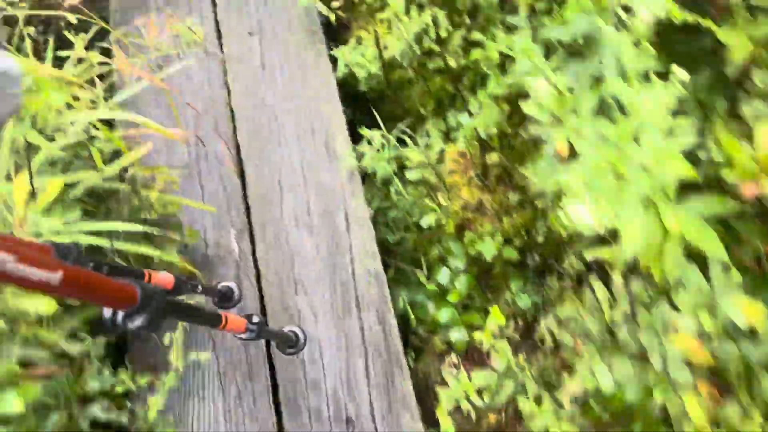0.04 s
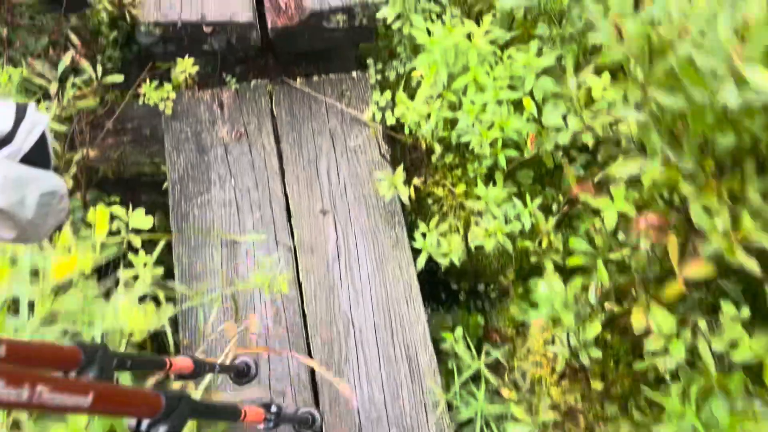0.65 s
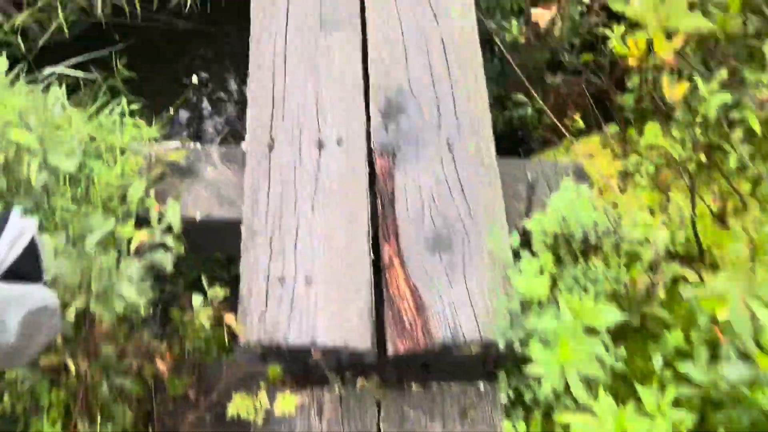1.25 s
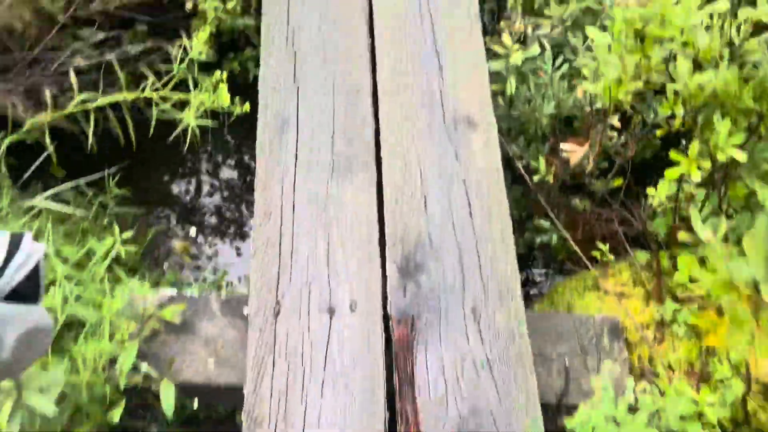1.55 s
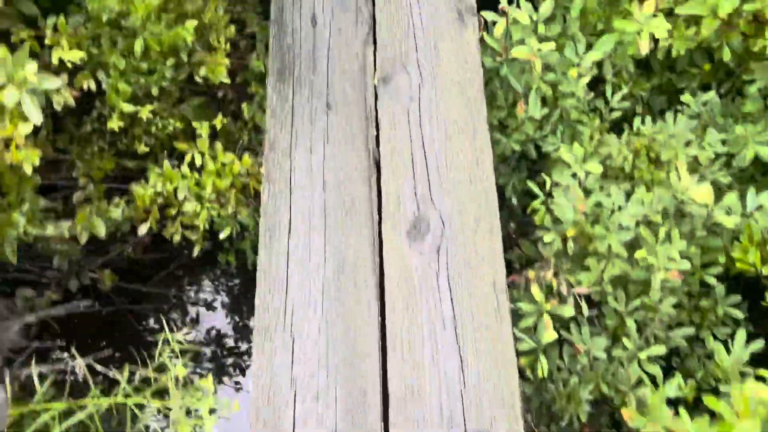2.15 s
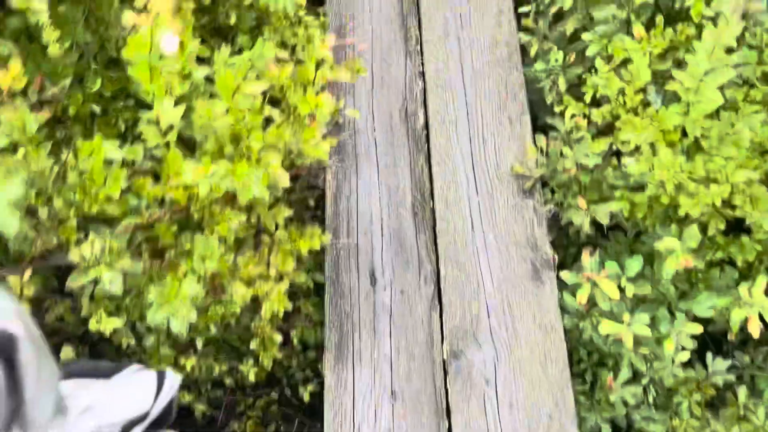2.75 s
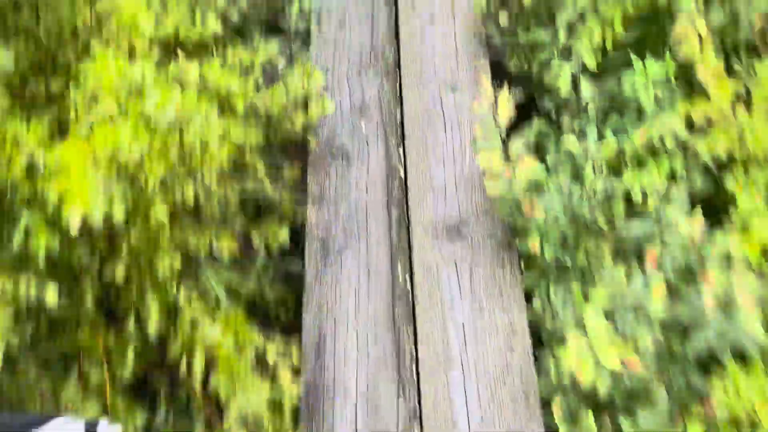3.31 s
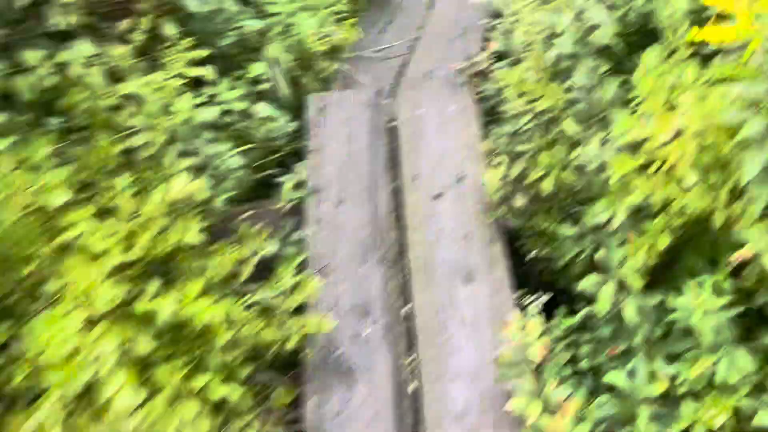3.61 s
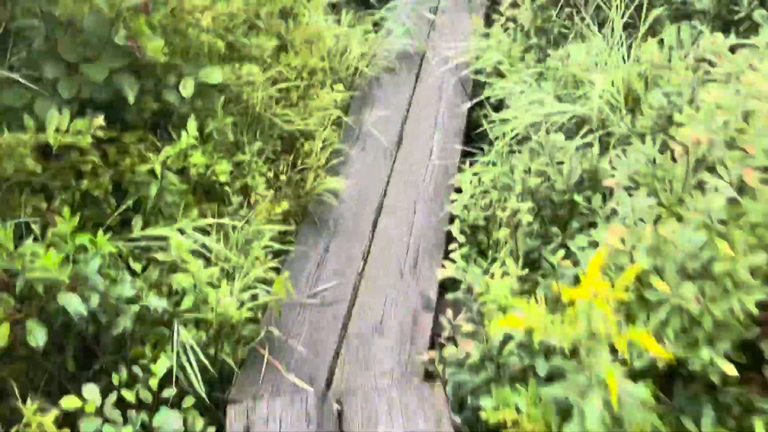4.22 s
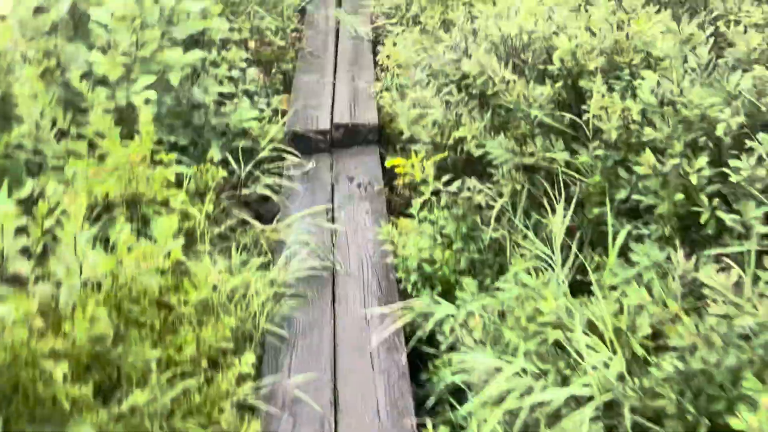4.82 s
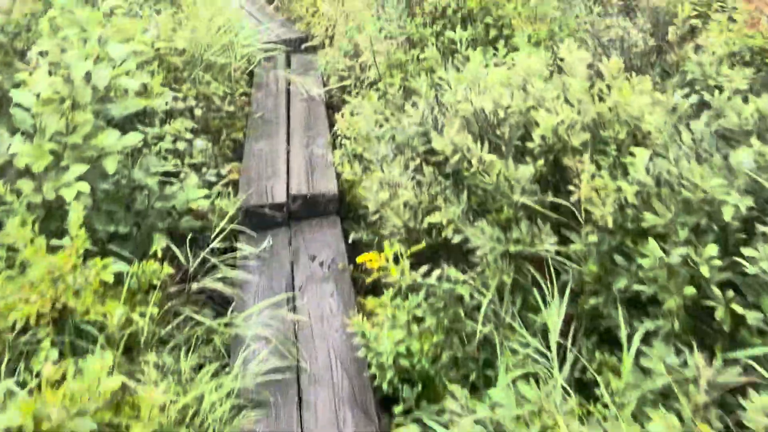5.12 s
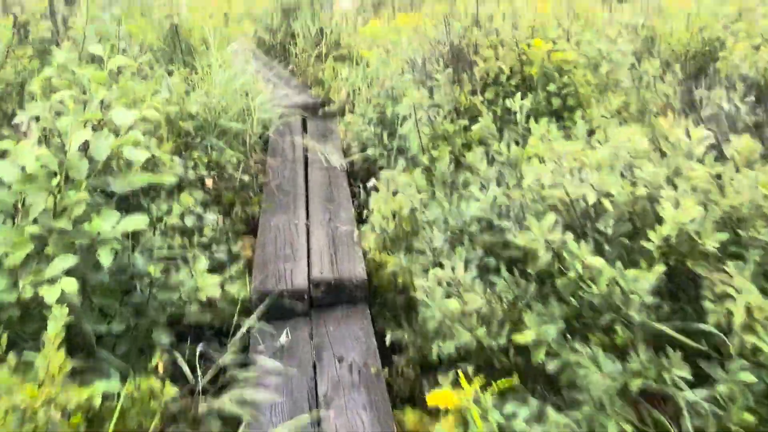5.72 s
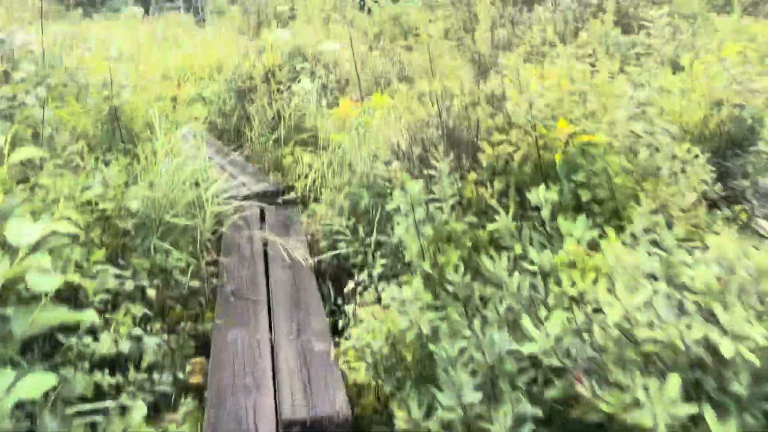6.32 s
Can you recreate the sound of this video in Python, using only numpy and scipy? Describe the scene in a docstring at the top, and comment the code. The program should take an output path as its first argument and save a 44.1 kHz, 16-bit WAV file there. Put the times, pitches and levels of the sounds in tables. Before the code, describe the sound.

Close, dry footsteps thud on damp wooden planks, mixed with uneven clacks of trekking pole tips and short scuffs of soles. One hard pole bump hits near the microphone just after the start. The walk carries on with fabric and foliage rustling and ticking, swelling briefly near the end. Each step stirs a soft, low air rumble on the microphone, above the faint hush of the woods.

```python
"""Boots thud along a plank boardwalk in wet woodland, each step pushing down a board that springs back.
The hiker's trekking poles and loose planks clack, and soles and tips grind on the damp wood.
Clothing and leaves swish and crackle with every stride, in tiny slips over a duller scuff.
Early on a pole bumps hard, close to the microphone; stems and straps tick here and there.
Underneath, stirred air rumbles softly over the hush of the woods."""
import sys
import numpy as np
from scipy import signal
from scipy.fft import rfft, irfft
from scipy.io import wavfile

SR = 44100
rng = np.random.default_rng(int(sys.argv[2]) if len(sys.argv) > 2 else 0)


def file_out(sig):
    """Save sig as 16-bit WAV at sys.argv[1]."""
    # one column per channel
    cols = np.atleast_2d(sig).T
    # limit, then scale
    lim = np.clip(cols, -1, 1)
    pcm = np.round(lim * 32767).astype(np.int16)
    wavfile.write(sys.argv[1], SR, pcm)


N = 284922

# Boots landing, rolling and shifting weight. Each row: time in seconds, level in dB,
# pitch of the push in Hz, level of the stirred air in dB.
FOOTFALLS = [(.428, -30, 116, -35), (.473, -24.5, 261, -55), (0.508, -26.5, 140, -59),
             (.689, -29.5, 58.4, -47), (0.781, -28.5, 69, -39.5), (1.088, -36, 55.5, -37.5),
             (1.484, -35, 60.5, -37), (1.551, -25, 85, -48), (2.004, -32.5, 31.2, -37),
             (2.21, -27, 110, -47), (2.253, -32, 204, -36), (2.56, -41, 28, -38.5), (2.73, -28.5, 49, -53),
             (3.179, -31.5, 109, -45), (3.355, -36, 34.7, -39), (3.741, -24, 150, -31.5),
             (3.784, -23, 86, -36), (3.95, -33.5, 48, -47.5), (4.392, -34, 31.8, -37),
             (5.258, -36.5, 92, -47), (5.341, -39, 50, -39), (5.585, -26.5, 360, -60),
             (5.783, -32, 84, -39), (5.825, -28.5, 133, -46), (5.847, -26, 516, -49), (5.882, -33, 50, -38),
             (6.128, -27.5, 209, -37.5)]
# Pole tips and planks clacking. Each row: start in seconds, level in dB, centre of the tone in Hz.
CLACKS = [(.0398, -30.5, 1140), (0.0499, -35.5, 990), (.0925, -31, 990), (.4473, -39, 1300),
          (.485, -36, 1400), (0.5165, -27, 1480), (1.2261, -42.5, 850), (1.4768, -33, 1150),
          (1.781, -45, 750), (1.8032, -44, 700), (1.864, -39, 990), (2.233, -30, 1510),
          (2.248, -33.5, 1100), (2.4744, -40, 1100), (2.707, -44.5, 900), (2.9687, -41.5, 970),
          (3.2135, -35.5, 1020), (3.581, -35, 920), (3.5953, -25, 1190), (3.753, -34.5, 960),
          (3.7892, -30.5, 1760), (3.9316, -43, 1000), (4.042, -44, 1100), (4.401, -37, 1150),
          (4.545, -38.5, 885), (4.622, -39, 1150), (4.635, -30.5, 1380), (5.008, -41.5, 1190),
          (5.0381, -34, 750), (5.5732, -28.5, 970), (5.6934, -34, 1170), (5.8407, -29, 1400),
          (5.853, -30, 1550), (5.999, -38.5, 1270), (6.0945, -37, 935), (6.3317, -39.5, 1540)]
# The ring of a damp plank. Each row: pitch in Hz, level in dB, time to fall 60 dB in seconds.
PLANK_MODES = [(354, -35, 0.087), (576, 5.5, 0.023), (825, 8.5, 0.0094), (1100, -4, 0.01),
               (1303, 0.5, 0.0094), (1760, -13.5, 0.013), (2550, 2, .012), (3820, -19, .01)]
# A sole or tip grinding along the wood. Each row: middle in seconds, half length in seconds,
# level in dB, centre of the tone in Hz.
WOOD_GRINDS = [(0.181, 0.031, -53, 1790), (0.493, 0.013, -53, 2000), (1.492, 0.015, -49, 990),
               (2.29, 0.019, -49.5, 1100), (2.419, .011, -51, 1700), (3.213, 0.0061, -44.5, 1250),
               (3.592, 0.0096, -45.5, 1300), (4.633, 0.0045, -50, 1400), (5.039, 0.011, -55, 880),
               (5.252, 0.0067, -47, 950), (5.583, 0.014, -47, 760), (5.815, 0.0071, -38.5, 1450),
               (5.852, 0.012, -35.5, 1600), (6.129, 0.017, -48, 990)]
# The hits of the close pole bump. Each row: start in seconds, level in dB,
# length of the push in seconds, level of the crack against the push in dB.
POLE_BUMPS = [(.4053, -15, 0.0013, -9.5), (0.4275, -28.5, 0.001, -8.5), (0.4712, -34, 0.0015, -12)]
# The ring of the pole shaft. Each row: pitch in Hz, level in dB, time to fall 60 dB in seconds.
SHAFT_MODES = [(2080, -32, .007), (2600, 2, 0.0052), (4900, -5, 0.0082), (12000, 1, 0.0044),
               (14300, 3, 0.0031)]
# A sleeve, trouser leg or branch sliding past. Each row: middle in seconds, length in seconds,
# swish level in dB, treble over mids in dB, scuff level in dB.
RUB_STROKES = [(0.106, 0.042, -57.5, -4, -55), (0.218, 0.092, -54, -6, -49.5),
               (0.273, .047, -51.5, -7, -65), (0.445, .11, -59, 2, -51), (0.648, 0.12, -61.5, -4, -49),
               (.86, .075, -56.5, -3, -56), (0.926, 0.057, -56, -4, -47), (1.011, .056, -54.5, -4, -51),
               (1.298, 0.086, -62, 2, -54), (1.407, 0.085, -50, -4.5, -51), (1.499, 0.064, -52.5, -3, -43),
               (1.58, 0.096, -60, -1, -51), (1.892, 0.075, -57, -1, -52), (1.99, 0.087, -57, -9, -53),
               (2.077, 0.078, -55.5, -1, -52.5), (2.195, 0.053, -59, 0, -57), (2.422, 0.049, -64.5, 2, -53),
               (2.503, 0.11, -59.5, -3, -55), (2.643, .15, -50.5, 1, -53.5), (2.792, .04, -61, 14, -66),
               (2.927, 0.065, -58.5, 0, -49.5), (3.109, 0.098, -56, -2, -52.5),
               (3.182, 0.066, -55, -4, -47), (3.263, .06, -48.5, -5, -50), (3.375, 0.11, -60, -1, -57),
               (3.534, 0.069, -59.5, 0, -48.5), (3.645, .1, -51, -8.5, -59), (3.765, 0.078, -48, -6, -43.5),
               (3.85, 0.079, -53.5, -4, -55.5), (3.945, 0.052, -57.5, -3, -53.5),
               (4.035, 0.05, -60, 8, -55), (4.166, 0.066, -52, -2, -57.5), (4.229, 0.083, -55, -5, -53.5),
               (4.326, 0.041, -57, -3, -55), (4.433, .14, -62, -11, -54), (4.589, 0.072, -58, -3, -48),
               (4.667, 0.054, -55, -3, -51.5), (4.759, 0.13, -62, -3, -55), (5.162, 0.07, -53, -0.5, -58),
               (5.245, 0.07, -55, -7, -48), (5.305, 0.036, -52, -9, -48.5), (5.374, .045, -58.5, -9, -48),
               (5.7, 0.17, -63.5, -7, -58.5), (5.822, 0.14, -46, -1.5, -44), (5.918, 0.076, -44, 7.5, -44),
               (6.014, 0.033, -56, -10, -48), (6.125, 0.055, -52, -5, -42.5),
               (6.413, 0.18, -57.5, -2.5, -52.5)]
# The light rustle between strokes. Each row: time in seconds, level in dB.
RUSTLE_LEVELS = [(0, -64), (.7, -62.5), (1.15, -65.5), (1.7, -70), (2.1, -63), (2.37, -69.5), (2.75, -64),
                 (3.45, -67), (4.5, -66), (4.95, -69), (5.5, -65), (6.2, -62), (6.46, -71.5)]
# The tone of the swish. Each row: frequency in Hz, level in dB.
SWISH_EQ = [(250, 16), (600, 7), (1150, 5.5), (1800, 0), (3300, -1), (6000, -1), (9000, 1), (12000, 4),
            (14000, 0), (15700, -5)]
# Resonances the fabric rustles through. Each row: centre in Hz, width in Hz, boost in dB.
FABRIC_PEAKS = [(2490, 500, 6.5), (3900, 185, 5), (4790, 500, 6.5), (7400, 200, 2.5), (8100, 160, 2)]
# Ticks and squeaks of stems, straps and wet wood. Each row: start in seconds, level in dB,
# pitch in Hz, decay time in seconds.
BRIGHT_TICKS = [(.2605, -33.5, 3500, 0.00083), (0.407, -45, 12600, 0.0084), (0.468, -41.5, 4930, 0.0025),
                (0.515, -39.5, 9200, .0015), (1.147, -43, 9000, 0.00058), (1.477, -36.5, 3930, 0.001),
                (1.786, -43.5, 8040, 0.0043), (1.795, -39, 8800, .013), (1.872, -44, 7000, .00084),
                (1.987, -40.5, 7460, 0.00076), (2.114, -44, 4500, .001), (2.232, -39.5, 9500, .0015),
                (2.32, -42, 2660, .0011), (2.943, -45.5, 3700, .0022), (3.269, -44, 3540, .0018),
                (4.138, -46, 12000, .002), (4.723, -44, 2760, .0013), (6.351, -42, 5870, 0.0014)]
# The dull tone of the scuff. Each row: frequency in Hz, level in dB.
SCUFF_EQ = [(30, 4.5), (60, 9), (110, 1.5), (200, 1), (400, -4.5), (700, -10.5), (1050, -10), (1600, -18.5),
            (3000, -32.5), (8000, -46)]
# The low rumble of stirred air. Each row: frequency in Hz, level in dB.
BUFFET_EQ = [(8, -2.5), (27, -0.5), (42, -2.5), (60, -13), (110, -13), (180, -44), (400, -33),
             (2000, -54.5)]
# The hush of still woodland. Each row: frequency in Hz, level in dB.
HUSH_EQ = [(30, 24), (150, -10.5), (400, 0), (700, -32), (1000, -30), (1500, -7), (3000, -17), (7000, -10),
           (15000, -33)]


def boots(gain_db=-1, rebound=0.075, rebound_s=0.032, roll_db=-9, roll_s=.014, roll_rise=1.7):
    """A boot pushes the board down; it springs back, and the sole rolls on with a lighter, quicker push."""
    out, t = np.zeros(N), np.arange(-SR // 20, SR // 8) / SR
    after = np.maximum(t, 0)
    for (s, db, hz, _), lag in zip(FOOTFALLS, rng.uniform(.5, 1.5, len(FOOTFALLS))):
        for delay_s, drop_db, push_hz in [(0, 0, hz), (roll_s * lag, roll_db, hz * roll_rise)]:
            u = (np.pi * push_hz * t) ** 2
            push = (2 * u - 1) * np.exp(-u)
            settle = rebound * np.sin(2 * np.pi * push_hz * after) * np.exp(-after / rebound_s)
            add(out, s + delay_s + t[0], amp(db + gain_db + drop_db) * (push + settle))
    return out


def clacks(gain_db=-1, chatter_db=-22, chatter_s=0.002, bounce_db=-9, bounce_s=0.0066):
    """One hard hit on a plank, then a short chatter and a small bounce as the tip seats itself."""
    out, t = np.zeros(N), np.arange(SR // 12) / SR
    for s, db, hz in CLACKS:
        chatter = amp(chatter_db) * rng.standard_normal(len(t)) * np.exp(-t / chatter_s)
        force = (t == 0) + chatter
        add(force, bounce_s * rng.uniform(.5, 1.5), [amp(bounce_db)])
        clack = plank(force, hz, q=2.5, ring_db=-32.5)
        add(out, s, amp(db + gain_db) * clack / abs(clack).max())
    return out


def plank(force, hz, q, ring_db, contact_s=.0001):
    """A contact force sets the damp plank ringing; the spot that is touched picks the tone."""
    t = np.arange(len(force)) / SR
    contact = np.gradient(t ** 2 * np.exp(-t / contact_s))
    blow = signal.fftconvolve(force, contact)
    wood = (t == 0) + amp(ring_db) * ring(PLANK_MODES, t, detune=0.19)
    return band(signal.fftconvolve(blow, wood)[:len(t)], hz, q)


def grinds(slips_per_s=2500):
    """A sole or pole tip drags: a short swell of dense slips shakes the plank."""
    out, t = np.zeros(N), np.arange(-SR // 16, SR // 10) / SR
    for s, half_s, db, hz in WOOD_GRINDS:
        swell = np.exp(-(t / half_s) ** 2)
        force = swell * rng.standard_normal(len(t)) * (rng.random(len(t)) < slips_per_s / SR)
        grind = plank(force, hz, q=1.33, ring_db=-30)
        add(out, s + t[0], amp(db) * grind * np.linalg.norm(swell) / (np.linalg.norm(grind) + 1e-12))
    return out


def grit(load, gain_db=-9):
    """Stray little taps on the plank, as strong as the scuffing that sets them off."""
    hits = scatter(per_s=22, spread_db=3)
    tap = plank(signal.unit_impulse(SR // 12), hz=1050, q=2.4, ring_db=-35)
    return amp(gain_db) * unit_rms(signal.oaconvolve(hits, tap)[:N]) * load


def pole_bump(crack_s=0.0012, ring_db=-2, fizz_db=-24, fizz_s=0.011):
    """A blunt pressure push with a dry crack, a brief ring of the shaft and a fizz as it slides off."""
    out, t = np.zeros(N), np.arange(SR // 12) / SR
    for s, db, push_s, crack_db in POLE_BUMPS:
        push = -np.sin(3.56 * t / push_s) * np.exp(-t / push_s)
        crack = .5 * rng.standard_normal(len(t)) * np.exp(-t / crack_s)
        fizz = band(rng.standard_normal(len(t)), hz=12500, q=1.6) * amp(fizz_db) * np.exp(-t / fizz_s)
        bright = crack + fizz + amp(ring_db) * ring(SHAFT_MODES, t, detune=0.029)
        add(out, s, amp(db) * (push / abs(push).max() + amp(crack_db) * bright))
    return out


def swish(slide, sheen_db, gain_db=1, pivot_hz=6200, folds_db=2.1, spurts_db=1.3):
    """Fabric and leaves catch and slip thousands of times a second; each fold has its own colour."""
    rub = coloured(friction(slips_per_s=2400, spread_db=3.4, smooth=.65), SWISH_EQ, FABRIC_PEAKS)
    hz, frame_s, spectrum = signal.stft(rub, SR, nperseg=256)
    patch = np.outer(np.hanning(7), np.hanning(17))  # one fold's spread in pitch and time
    folds = unit_rms(signal.fftconvolve(rng.standard_normal(spectrum.shape), patch, "same"))
    seesaw = .5 * np.tanh(2 * np.log((hz + 1) / pivot_hz))  # treble up, mids down
    tilt_db = seesaw[:, None] * np.interp(frame_s * SR, np.arange(N), sheen_db)
    rub = signal.istft(spectrum * amp(tilt_db + folds_db * folds), SR, nperseg=256)[1][:N]
    return rub * slide * amp(gain_db + spurts_db * wander(per_s=70))


def rubbing(rustle_load_db=6.5, rustle_sheen_db=-3, restless_db=2):
    """Strokes over a restless rustle set the swish's gain (slide), its sheen and the scuff's gain (load)."""
    middle_s, length_s, swish_db, treble_db, scuff_db = np.transpose(RUB_STROKES)
    slides = swells(middle_s, length_s, swish_db)
    loads = swells(middle_s, length_s, scuff_db)
    rustle = amp(follow(RUSTLE_LEVELS) + restless_db * wander(per_s=14)) ** 2
    slide_power = slides.sum(0) + rustle
    load_power = loads.sum(0) + rustle * amp(rustle_load_db) ** 2
    sheen_db = (treble_db @ slides + rustle_sheen_db * rustle) / slide_power
    return np.sqrt(slide_power), sheen_db, np.sqrt(load_power)


def swells(middles_s, lengths_s, levels_db, squareness=3.5, catch=0.18):
    """One power envelope a stroke: it catches steeply, holds and eases off."""
    t, out = np.arange(N) / SR, []
    for s, length_s, db in zip(middles_s, lengths_s, levels_db):
        distance = np.minimum(abs(2 * (t - s) / length_s), 4)
        steepness = squareness * (1 + catch * np.sign(s - t))  # 2 is a bell; higher is more abrupt
        out.append(amp(db) ** 2 * np.exp(-2 * distance ** steepness))
    return np.array(out)


def friction(slips_per_s, spread_db, smooth):
    """Tiny slips of uneven size over a smooth rubbing noise."""
    sizes = amp(spread_db * np.minimum(rng.exponential(1, N), 4)) * rng.choice([-1, 1], N)
    slips = sizes * (rng.random(N) < slips_per_s / SR)
    return unit_rms(slips) + smooth * rng.standard_normal(N)


def crackle(slide, gain_db=-7, snap_s=0.0004):
    """Single creases and leaves snap within the swish, at many bright pitches."""
    out, t = np.zeros(N), np.arange(SR // 100) / SR
    for hz in np.geomspace(2200, 14000, num=16):
        ping = np.sin(2 * np.pi * hz * t) * np.exp(-t / snap_s)
        out += signal.oaconvolve(scatter(per_s=22, spread_db=4), ping)[:N]
    return coloured(out, SWISH_EQ, FABRIC_PEAKS) * slide * amp(gain_db)


def stem_flicks(slide, gain_db=-12, per_s=14, voices=4, snap_s=0.00041, tail_db=-16, tail_s=0.0057):
    """Stems flick against the fabric: crisp, wideband clicks with a tiny tail."""
    out, t = np.zeros(N), np.arange(SR // 40) / SR
    envelope = np.exp(-t / snap_s) + amp(tail_db) * np.exp(-t / tail_s)
    for _ in range(voices):
        hits = scatter(per_s / voices, spread_db=3)
        click = np.diff(rng.standard_normal(len(t)) * envelope)
        out += signal.oaconvolve(hits, click)[:N]
    return unit_rms(out) * slide * amp(gain_db)


def ticks():
    """Stems, straps and wet wood tick and squeak: tiny noise bursts through a bright resonance."""
    out, t = np.zeros(N), np.arange(SR // 10) / SR
    for s, db, hz, decay_s in BRIGHT_TICKS:
        q = 2 * np.sqrt(decay_s / 0.0026)  # a longer burst is more of a squeak
        burst = rng.standard_normal(len(t)) * np.exp(-t / decay_s)
        tick = band(band(burst, hz, q), hz, q)
        add(out, s, amp(db) * tick / abs(tick).max())
    return out


def scuff(load, gain_db=2, flutter_db=4.5):
    """Coarser, duller slips of soles and pack under the body's weight."""
    rub = coloured(friction(slips_per_s=900, spread_db=3.5, smooth=0.75), SCUFF_EQ)
    return rub * load * amp(gain_db + flutter_db * wander(per_s=19.4))


def air_buffet(gain_db=-3, walking_db=-52, rise_s=0.081, fall_s=0.085, gust_db=4.35):
    """Each footfall jolts the microphone through the air: a soft, lumpy rumble."""
    t = np.arange(N) / SR
    jolt_power = sum((amp(db) * np.exp(np.minimum((t - s) / rise_s, (s - t) / fall_s))) ** 2
                     for s, _, _, db in FOOTFALLS)
    flow = np.sqrt(jolt_power + amp(walking_db) ** 2)
    rumble = coloured(rng.standard_normal(N), BUFFET_EQ)
    return rumble * flow * amp(gain_db + gust_db * wander(per_s=11))


def woodland_hush(level_db=-64):
    """The still woods: a faint, steady bed of noise."""
    return amp(level_db) * coloured(rng.standard_normal(N), HUSH_EQ)


def ring(modes, t, detune):
    """Dying modes, each a little off pitch depending on where the blow lands."""
    return sum(amp(db - 60 * t / t60) * np.sin(2 * np.pi * hz * (1 + detune * rng.uniform(-1, 1)) * t)
               for hz, db, t60 in modes)


def band(x, hz, q):
    """One broad resonance."""
    return signal.lfilter(*signal.iirpeak(min(hz, SR / 3), max(q, .8), fs=SR), x)


def coloured(x, eq, peaks=()):
    """Shapes x with an EQ curve and any resonant peaks, at an rms of one."""
    hz, db = np.transpose(eq)
    f = np.fft.rfftfreq(N, 1 / SR)
    curve_db = np.interp(np.log(f + 1), np.log(hz), db)
    peaks_db = sum(boost * np.exp(-((f - centre) / width) ** 2) for centre, width, boost in peaks)
    return unit_rms(irfft(rfft(x) * amp(curve_db + peaks_db), N))


def scatter(per_s, spread_db):
    """Impulses of uneven size at random moments."""
    sizes = amp(spread_db * np.minimum(rng.exponential(1, N), 3))
    return sizes * (rng.random(N) < per_s / SR)


def wander(per_s):
    """A smooth random drift that changes about so many times a second."""
    lowpass = np.exp(-(np.fft.rfftfreq(N, 1 / SR) / per_s) ** 2)
    return unit_rms(irfft(rfft(rng.standard_normal(N)) * lowpass, N))


def follow(rows):
    """Draws a curve through (seconds, value) points at every sample."""
    return np.interp(np.arange(N) / SR, *np.transpose(rows))


def add(mix, s, sound):
    """Mixes a sound in at s seconds."""
    part = mix[max(round(s * SR), 0):][:len(sound)]
    part += sound[:len(part)]


def amp(db):
    """Decibels to gain."""
    return 10 ** (np.asarray(db) / 20)


def unit_rms(x):
    """Scales to an rms of one."""
    return x / np.sqrt(np.mean(x ** 2) + 1e-20)


def scene():
    """A close, dry mono mix: the undergrowth returns no echo."""
    slide, sheen_db, load = rubbing()
    wood = boots() + clacks() + grinds() + grit(load)
    fabric = swish(slide, sheen_db) + crackle(slide) + stem_flicks(slide)
    return (wood + fabric + pole_bump() + ticks() + scuff(load) + air_buffet() + woodland_hush())[None]


def record(dry):
    """A steep low-pass trims the very top of the treble."""
    lowpass = signal.firwin(401, cutoff=15780, window=("kaiser", 9), fs=SR)
    return signal.oaconvolve(dry, lowpass[None], "same")


dry = scene()
out = record(dry)
file_out(out)
```